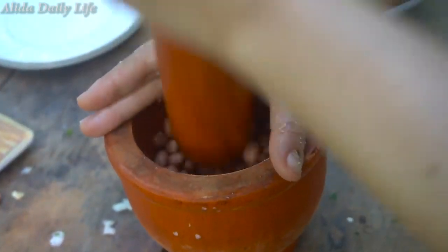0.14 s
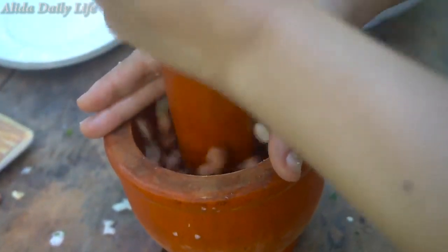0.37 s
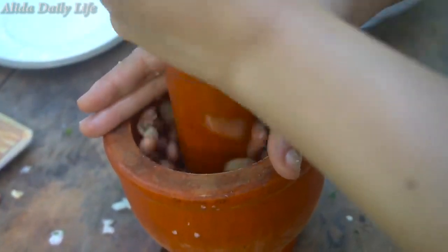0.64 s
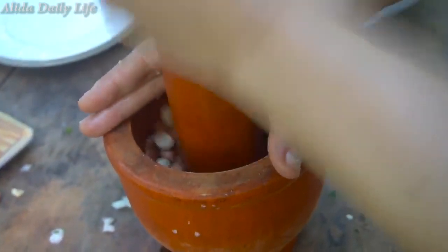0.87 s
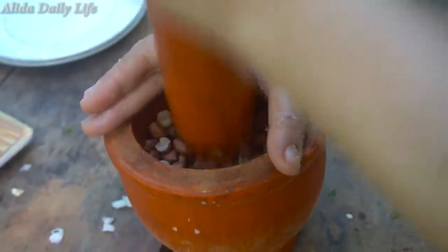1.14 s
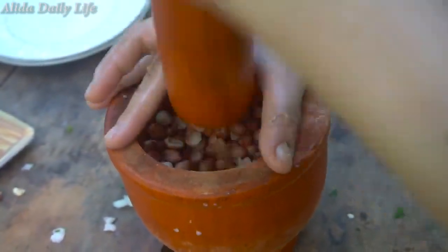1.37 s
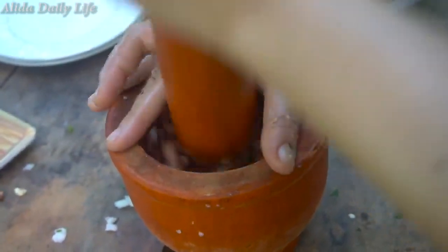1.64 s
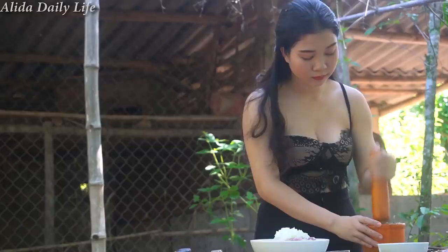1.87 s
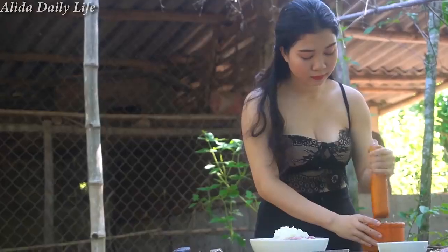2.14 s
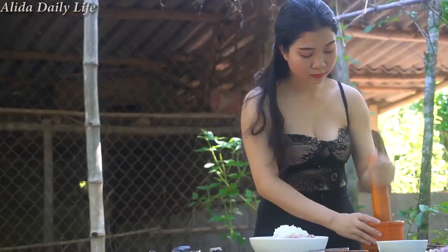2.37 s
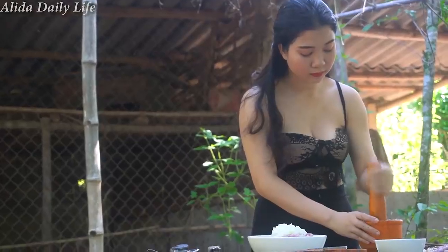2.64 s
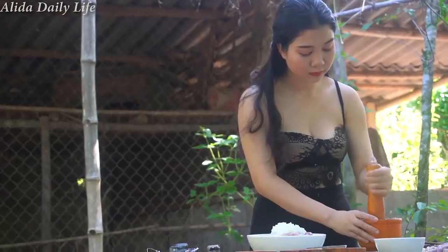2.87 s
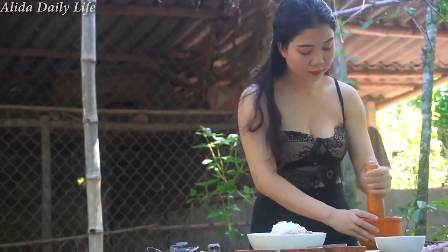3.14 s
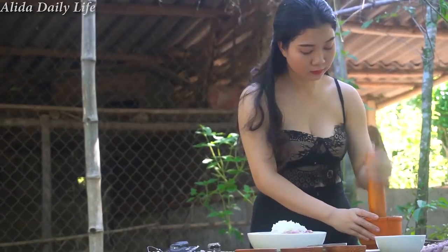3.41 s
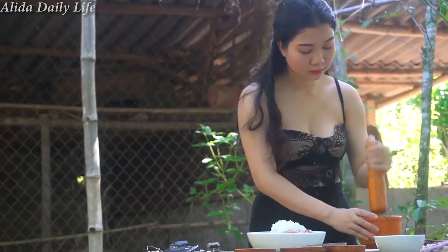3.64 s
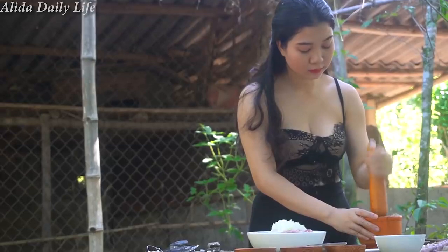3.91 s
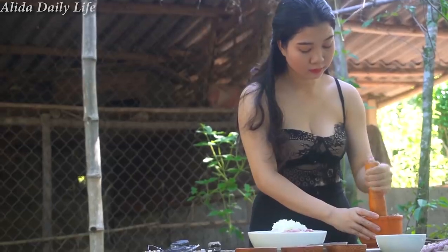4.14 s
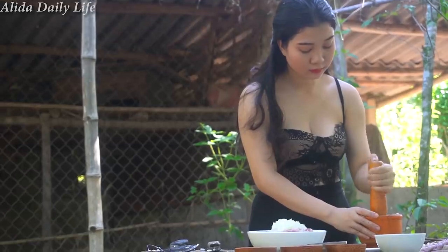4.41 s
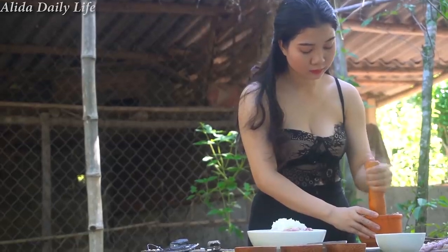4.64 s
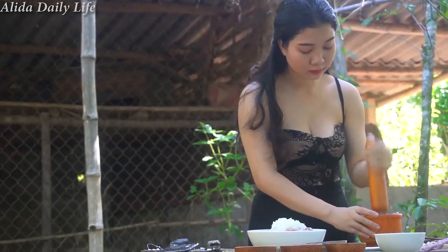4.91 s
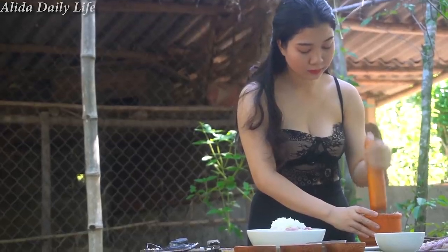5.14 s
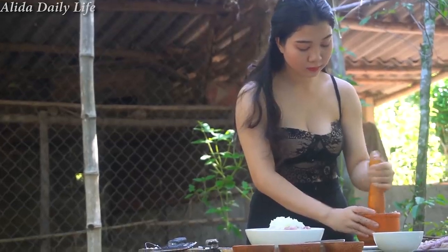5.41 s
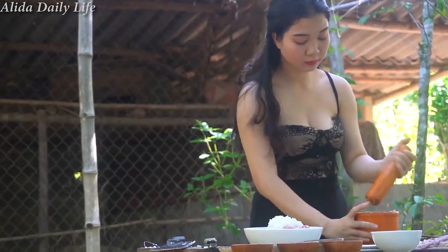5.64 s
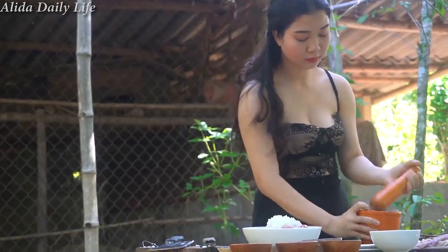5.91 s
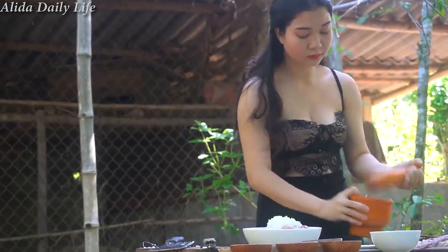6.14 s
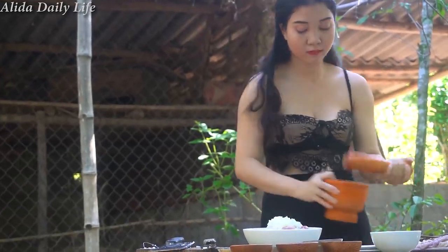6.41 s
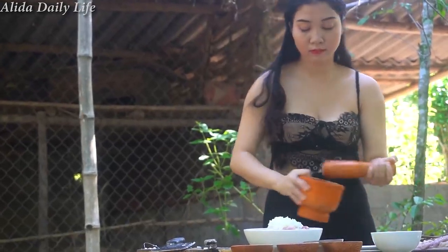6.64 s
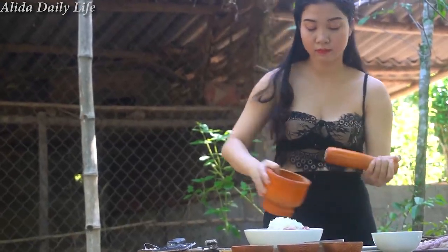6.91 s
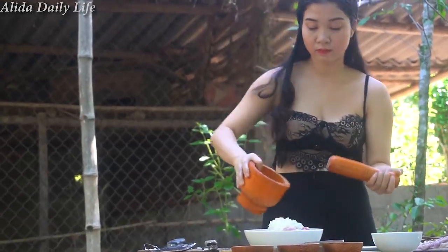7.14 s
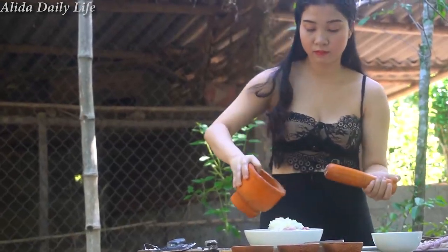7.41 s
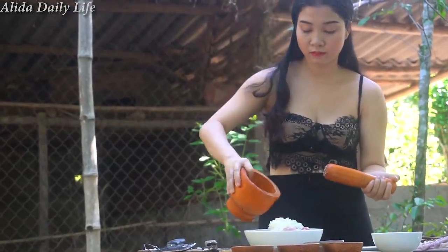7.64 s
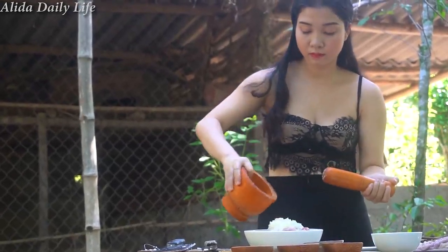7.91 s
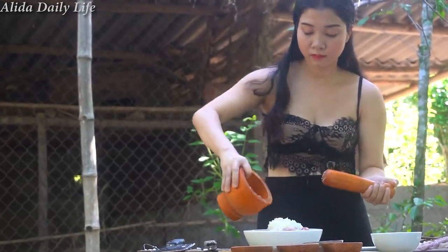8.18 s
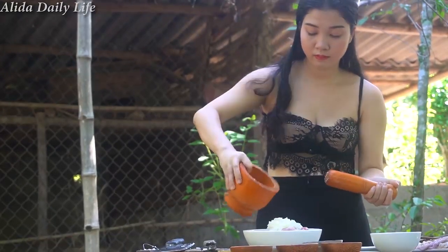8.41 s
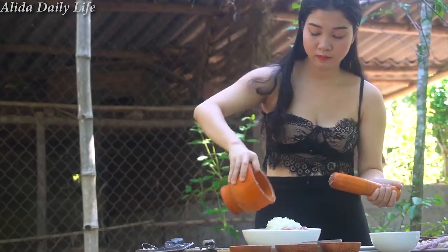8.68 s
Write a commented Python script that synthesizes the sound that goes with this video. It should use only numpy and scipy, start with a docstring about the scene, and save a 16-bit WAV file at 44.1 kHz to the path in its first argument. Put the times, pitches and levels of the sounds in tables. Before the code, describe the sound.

From 0 to 1.77 s the microphone is very close: six pestle blows, roughly 0.3 s apart, crunch peanuts with a gritty crack, a table thump and a quick rebound; dishes chatter and loose nuts rustle and tick. High cicadas buzz steadily over soft yard hiss. At 1.77 s the sound cuts to a farther place: cicadas drop somewhat, blows lose crack and bass, gain short roof echo, and bowls and a cup ring more clearly. The pounding keeps its pace with uneven strength, stronger near 3.26, 4.77 and 5.08 s, ending at 5.4 s. A faint low engine swells around 2.6 to 3.6 s and fades by 4.9 s. At 6.2, 6.44 and 6.67 s come three hollow, dry wooden taps on the rim, the last brightest. From 6.9 s tiny knocks cluster until 7.45 s, and a distant chick gives five faint, falling peeps until the end, under the cicadas.

```python
"""A wooden pestle pounds peanuts in a mortar on a light table under a tin roof, amid droning cicadas.
Close at first: each blow is a gritty force that crunches the nuts, thumps the table and makes it rebound,
so the crockery's modes chatter and ring, while loose nuts rustle. At 1.77 s the sound switches at once to
a place further off, and a far engine, a tone with its half order, swells and fades. After the last blow the
pestle taps the mortar's rim, a set of short modes; small knocks sound and a chick peeps in sliding whistles."""
import sys
import numpy as np
from scipy import signal
from scipy.fft import rfft, irfft, next_fast_len
from scipy.io import wavfile
from scipy.ndimage import uniform_filter1d, map_coordinates

SR = 44100
rng = np.random.default_rng(int(sys.argv[2]) if len(sys.argv) > 2 else 0)


def decibels_to_gain(level_db):
    """Convert a level in decibels to a linear amplitude gain (20 dB per decade)."""
    exponent = np.asarray(level_db, float) / 20
    return 10 ** exponent


def wav_out(sig):
    """Save sig, one row per channel (or a flat mono array), as 16-bit PCM at SR to the path in sys.argv[1]."""
    wavfile.write(sys.argv[1], SR, np.round(np.clip(np.atleast_2d(sig).T, -1, 1) * 32767).astype(np.int16))


N = 387638

# Cicadas' spectrum. Each row: frequency in Hz, relative density in dB.
CICADA_SPECTRUM = [(2350, -76), (4000, -43), (4990, -49), (5140, 0.5), (5620, 2), (6820, 1.5), (8270, -8),
                   (8760, -14), (9260, -14), (10500, -33), (22000, -120)]
# Spectrum of the yard's hiss. Each row: frequency in Hz, relative density in dB.
YARD_SPECTRUM = [(15, -59.5), (25, -11), (130, -20.5), (405, -11.5), (463, -18), (531, -9), (1400, -14.5),
                 (4140, -16.5), (5430, -7.5), (6560, -4.5), (9840, -20), (16000, -28.5)]
# Background heard from far. Each row: time in seconds, cicada level in dB, yard level in dB.
BACKGROUND_LEVELS = [(0, -49.5, -46.5), (4, -47, -51), (6, -47.5, -52), (8.79, -47, -53)]
# Likeness of the background at both ears. Each row: frequency in Hz, likeness from 0 to 1.
EAR_LIKENESS = [(60, .995), (180, 0.53), (550, 0.54), (1650, 0.14), (5000, 0.064)]
# Balance of the background. Each row: frequency in Hz, left minus right in dB.
EAR_BALANCE = [(240, 5), (950, -0.5), (6000, 1.5)]
# Far engine. Each row: time in seconds, firing rate in Hz, relative level in dB.
ENGINE_COURSE = [(0, 79.6, -78), (1.74, 76.2, -72), (1.76, 80, -70), (2.6, 80, -61), (3.6, 84, -59.5),
                 (4.5, 94.6, -70.5), (4.9, 94, -91), (8.79, 77, -87.5)]
# Steady faint tones. Each row: frequency in Hz, middle level in dB.
HUM_TONES = [(125, -78.5), (525, -76)]
# Chick. Each row: start in seconds, level in dB.
CHICK_PEEPS = [(6.945, -61), (7.44, -59), (7.85, -62), (8.27, -64), (8.70, -62)]
# Resonances of nuts rolling in the mortar. Each row: frequency in Hz, width in Hz, relative level in dB.
NUT_RESONANCES = [(1500, 5500, -2.5), (8750, 9000, 2.5)]
# Echo under the roof. Each row: frequency in Hz, t60 in seconds.
ROOF_DECAY = [(150, 0.21), (1000, 0.34), (4000, 0.35), (12000, 0.3)]
# Loose nuts and small knocks. Each row: start in seconds, relative level in dB, pitch in Hz, t60 in seconds.
KNOCKS = [(.162, -37, 1140, 0.044), (0.199, -13.5, 10450, 0.0065), (.53, -31.5, 1800, 0.11),
          (1.059, -18, 1280, 0.024), (1.067, -17.5, 1126, 0.054), (1.147, -37, 1500, 0.025),
          (1.622, -12.5, 1150, 0.043), (2.541, -21.5, 2510, 0.028), (3.827, -28.5, 1500, 0.013),
          (6.948, -46.5, 1300, 0.029), (7.165, -55, 2120, .6), (7.221, -44.5, 2100, 0.13),
          (7.224, -49, 620, 0.068), (7.267, -50.5, 1900, 0.11), (7.342, -48, 2350, 0.11),
          (7.342, -48.5, 655, 0.052), (7.425, -37.5, 350, 0.022), (7.424, -33, 1960, 0.017),
          (7.44, -44, 2080, 0.06)]
# Pestle on the rim. Each row: start in seconds, relative level in dB, brightness in dB.
RIM_TAPS = [(6.204, -7, -30.5), (6.438, -5.5, -28.5), (6.672, -4, -21.5)]
# Modes of the mortar's wall. Each row: frequency in Hz, relative level in dB, t60 in seconds.
RIM_MODES = [(708, -8.5, 0.023), (1100, -3, 0.013), (1363, 17, 0.0047), (1452, -17, 0.055),
             (1690, -11, 0.011), (2860, -9, 0.014), (4420, -3, 0.0056), (6710, -2.5, 0.0021)]
# Modes of both bowls. Each row: frequency in Hz, relative level in dB, t60 in seconds.
BOWL_MODES = [(1605, -6, .5), (2342, -6, .24), (3128, -2, .09), (3542, -3, .2), (3676, -3, .14)]
# Mode of the cup. Each row: frequency in Hz, relative level in dB, t60 in seconds.
CUP_MODES = [(3957, 0, .46)]
# Modes of the dishes. Each row: frequency in Hz, relative level in dB from far, relative level in dB
# from close, t60 in seconds.
DISH_MODES = [(3260, -20, -1, .03), (4964, -1, -3, .016), (5195, 1, 3, .024), (6321, -8, -8, .03),
              (6835, -3, -12, .03), (7125, 3, -7, .02), (7660, -1, -5, .02), (9120, -16, -6, .045),
              (10750, -11, -12, .018), (12600, -9, -14, .005)]
# Resonances of the table. Each row: frequency in Hz, width in Hz, relative level in dB.
TABLE_RESONANCES = [(163, 150, -8), (272.3, 49, 1), (404, 57, 0.5), (587, 74, 0.5), (696, 55, 1)]
# Resonances of the mortar at rest. Each row: frequency in Hz, width in Hz, relative level in dB.
MORTAR_RESONANCES = [(805, 210, 2), (1186, 277, 2), (1800, 144, 4), (2345, 420, -2.5), (3234, 440, -2.5),
                     (5240, 23000, -40)]
# Resonances of splitting shells. Each row: frequency in Hz, width in Hz, relative level in dB.
SHELL_RESONANCES = [(4130, 4400, 22), (10000, 6000, -13.5)]
# Pestle blows. Each row: time in seconds, force in dB, then relative levels in dB of the dish chatter,
# small bowl ring, big bowl ring and cup ring.
PESTLE_BLOWS = [(0.08, -12.5, 4, -10, -17, -20), (0.379, -16.5, 1, -15.5, -10, -16),
                (0.675, -12.5, -5, -15.5, -15, -26), (0.975, -13.5, -4, -15.5, -19, -15),
                (1.277, -13, -4, -7, -7.5, -13), (1.576, -10, -20.5, -13.5, -16.5, -22),
                (1.779, -10, 5.5, -2, -2.5, -6), (2.053, -14, -1, -4, -2, -1.5),
                (2.345, -10.5, 3.5, -5, -23, -13.5), (2.652, -13.5, -3.5, -7, -3.5, -1.5),
                (2.953, -26, -9.5, -9, -19, -2), (3.257, -6.5, 2, -6.5, -7.5, -10.5),
                (3.554, -16.5, -3.5, -5.5, -5.5, -12.5), (3.854, -11, 1.5, -4.5, -27, -12),
                (4.153, -22.5, -3.5, -5.5, -4, -8), (4.466, -19, -1.5, -8, -3, -2.5),
                (4.767, -8.5, 4, -3, 1, -14), (5.079, -8, 2, -3.5, -5.5, -27),
                (5.391, -21, -1.5, -6.5, -13, -8.5)]
# The table springs back after a blow. Each row: time in seconds, force in dB.
TABLE_REBOUNDS = [(.094, -11), (0.119, -13), (0.397, -14.5), (.42, -16.5), (0.701, -4), (.989, -9),
                  (1.014, -9), (1.292, -0.5), (1.603, -7.5), (2.081, -19), (2.375, -12.5), (2.685, -16),
                  (2.989, -20.5), (3.281, -16.5), (3.585, -19.5), (3.882, -13), (4.191, -23.5), (4.26, -31),
                  (4.497, -21), (4.791, -16.5), (5.108, -11), (5.415, -20.5)]
# How a jolt sounds from each place. Each pair holds blow, rebound: rise_s and t60_s of a usual jolt's
# force in seconds; crack_db, thump_db, chatter_db and ring_db, relative levels in dB. Single values:
# split_s, t60 of the extra decay of shell splitting in seconds; wet_db, echo in dB; left_db, gain in dB
# on the left and its opposite on the right; bass_hz, bass corner in Hz.
CLOSE_PLACE = dict(rise_s=[.003, .0045], t60_s=[0.091, 0.086], crack_db=[7.5, -32], thump_db=[-4.5, -20],
               chatter_db=[2, -4], ring_db=[-8.5, 11], split_s=0.064, wet_db=-7, left_db=0.63, bass_hz=40.7)
FAR_PLACE = dict(rise_s=[.006, .0055], t60_s=[0.12, .13], crack_db=[-14, -3.5], thump_db=[-15, -20.5],
             chatter_db=[-0.5, 1.5], ring_db=[-0.1, 2.3],
             split_s=0.11, wet_db=-3.5, left_db=-0.36, bass_hz=147)

SWITCH_S = 1.772  # the sound switches at once from the close place to the far one
CLOSE_CICADA_DB, CLOSE_YARD_DB = 8, -1  # change of each background level at the close place
LEAD_S = 0.000284  # the background reaches the left ear first
RIM_SCATTER_DB = 1.2
BIG_BOWL_HZ = 2000  # bowl modes below belong to the big bowl
USUAL_DB = -15  # a jolt of usual strength
LINGER = 0.29  # t60 grows this many dB for each dB under the usual: a soft jolt grinds on
SQUEEZE_S, SQUEEZE_DB = .014, -26  # the nuts give way just before the pestle lands
SHIFT, SHIFT_DB = .04, 2  # spread of the mortar's relative pitch and of its levels from jolt to jolt
CLUMP_DB = 3  # nuts break in clumps a few ms apart, so the force stutters
PAIR_HZ, BASS_HZ, TOP_HZ = 150, 70, 16100  # below PAIR_HZ the two sides grow alike


def unit(x):
    """Normalization: equal mean power, rms 1."""
    return x / np.sqrt(np.mean(x ** 2) + 1e-20)


def along(points, hz):
    """Interpolation of (Hz, value) points on a logarithmic frequency axis."""
    f, v = np.transpose(points)
    return np.interp(np.log(hz + 1), np.log(f + 1), v)


def curves(rows):
    """Linear interpolation in time: one value per sample for each column after the time."""
    s, *cols = np.transpose(rows)
    return [np.interp(np.arange(N) / SR, s, c) for c in cols]


def wobble(rate):
    """Slow random modulation: a smooth curve through rate random knots a second."""
    knots = rng.standard_normal(int(N * rate / SR) + 4)
    return map_coordinates(knots, [np.arange(N) * rate / SR])


def filtered(x, response):
    """Linear filtering: the spectrum times a complex response of frequency."""
    m = next_fast_len(x.shape[-1] + 8192)
    return irfft(rfft(x, m) * response(np.fft.rfftfreq(m, 1 / SR)), m)[..., :x.shape[-1]]


def bass_cut(x, corner_hz):
    """Second-order high-pass: two equal first-order sections."""
    return filtered(x, lambda hz: (1j * hz / (1j * hz + corner_hz)) ** 2)


def body(peaks):
    """Resonance: impulse response of damped resonators in alternating phase, energy 1."""
    def response(f):
        total = 0
        for k, (centre, width, db) in enumerate(peaks):
            resonator = 1j * f * width / (centre * centre - f * f + 1j * f * width)
            total = total + (-1) ** k * decibels_to_gain(db) * resonator
        return total
    answer = filtered(np.eye(1, 4096)[0], response)
    return answer / np.linalg.norm(answer)


def ring(modes, scatter_db, length, beat=0):
    """Modal decay: each strike excites the modes anew; an unround bowl splits its modes, so they beat."""
    t = np.arange(round(length * SR)) / SR
    hz, db, t60 = np.transpose(modes)[:, :, None]
    swell = np.cos(np.pi * beat * t * rng.uniform(.75, 1.3, hz.shape))
    level = decibels_to_gain(db + scatter_db * rng.standard_normal(hz.shape) - 60 * t / t60)
    return np.sum(level * swell * np.sin(2 * np.pi * hz * t), axis=0)


def grit(count, spiky_db):
    """Granular fracture: noise whose size jumps from grain to grain, rms 1."""
    sizes = np.minimum(rng.exponential(size=count // 40 + 1), 3.5)
    sizes = np.repeat(sizes, 40)[:count]
    return unit(rng.standard_normal(count) * decibels_to_gain(spiky_db * sizes))


def driven(force, spiky_db, answer):
    """Forced vibration: grit under a force curve shakes a body; the energy follows the force."""
    part = signal.fftconvolve(force * grit(len(force), spiky_db), answer)
    return np.pad(part, (0, SR - len(part))) * np.linalg.norm(force) / np.linalg.norm(part)


def roofed(x, wet_db):
    """Reverberation: direct sound plus a fresh tail for each ear, each frequency with its own decay."""
    hz, t, z = signal.stft(rng.standard_normal((2, SR // 2)), SR, nperseg=256)
    decay = decibels_to_gain(-60 * t / along(ROOF_DECAY, hz)[:, None])
    tail = signal.istft(z * decay, SR, nperseg=256)[1]
    likeness = [(300, .999), (700, 0.95), (1500, 0.68), (5000, 0.1)]  # low notes reach both ears alike
    shared = np.clip(along(likeness, np.fft.rfftfreq(tail.shape[1], 1 / SR)), 0, 1)
    left, right = rfft(tail)
    tail[1] = irfft(shared * left + np.sqrt(1 - shared ** 2) * right, tail.shape[1])
    delayed = np.pad(x, (130, 0))[None]
    wet = signal.fftconvolve(delayed, tail / np.linalg.norm(tail[0]), axes=1)
    return decibels_to_gain(wet_db) * wet + np.pad(x, (0, wet.shape[1] - len(x)))


def add(out, s, x):
    """Superposition: mixes x into out from second s."""
    part = out[:, round(s * SR):][:, :x.shape[1]]
    part += x[:, :part.shape[1]]


def rush(spectrum, patchy_db):
    """Diffuse field: partly alike stereo noise of rms 1 with patches of random gain."""
    z = signal.stft(rng.standard_normal((2, N)), nperseg=512)[2]
    field = rng.standard_normal(z.shape[1:])
    field = uniform_filter1d(uniform_filter1d(field, 6, 0), 10, 1)
    pair = signal.istft(z * decibels_to_gain(patchy_db * unit(field)), nperseg=512)[1][:, :N]

    def spread(hz):
        angle = np.arccos(np.clip(along(EAR_LIKENESS, hz), -1, 1)) / 2
        return decibels_to_gain(along(spectrum, hz)) * [np.cos(angle), np.sin(angle)]

    def direction(hz):
        balance = decibels_to_gain(np.outer([.5, -.5], along(EAR_BALANCE, hz)))
        return balance * np.exp(np.outer([1j, -1j], hz * np.pi * LEAD_S))

    mid, side = filtered(pair, spread)
    return unit(filtered(np.array([mid + side, mid - side]), direction))


def yard():
    """Broadband ambience: the yard's distant hiss is shaped noise of slowly varying level."""
    level_db = curves(BACKGROUND_LEVELS)[1]
    close = np.arange(N) < SWITCH_S * SR
    level_db = level_db + CLOSE_YARD_DB * close + .7 * wobble(6.9)
    return decibels_to_gain(level_db) * rush(YARD_SPECTRUM, patchy_db=1.8)


def cicadas():
    """Incoherent chorus: band-shaped noise that flutters slowly and quickly."""
    level_db = curves(BACKGROUND_LEVELS)[0]
    close = np.arange(N) < SWITCH_S * SR
    level_db = level_db + CLOSE_CICADA_DB * close + 0.84 * wobble(1.7) + 0.77 * wobble(120)
    return decibels_to_gain(level_db) * rush(CICADA_SPECTRUM, patchy_db=1.0)


def hums():
    """Steady tones: faint sinusoids wavering in level and phase."""
    t, out = np.arange(N) / SR, np.zeros(N)
    for hz, db in HUM_TONES:
        level = decibels_to_gain(db + 3.5 * wobble(0.94))
        out += level * np.sin(2 * np.pi * hz * t + 1.5 * wobble(3.0))
    return out


def engine():
    """Periodic firing: a far engine sounds its firing rate and the half order below."""
    hz, db = curves(ENGINE_COURSE)
    phase = 2 * np.pi * np.cumsum(hz) / SR
    level = decibels_to_gain(db + 5.0 + .8 * wobble(5.5))
    return level * (np.sin(phase) + decibels_to_gain(-7) * np.sin(phase / 2))


def chick():
    """Frequency modulation: short whistles slide down in pitch."""
    out, t = np.zeros((2, N)), np.arange(round(.055 * SR)) / SR
    pitch_hz = 2750 + 850 * np.exp(-t / 0.018)
    peep = np.sin(2 * np.pi * np.cumsum(pitch_hz) / SR) * np.sin(np.pi * t / t[-1])
    for s, db in CHICK_PEEPS:
        add(out, s, roofed(decibels_to_gain(db) * peep, wet_db=-10))
    return out


def nuts():
    """Granular friction: up close, loose nuts keep rustling, grit coloured by broad resonances."""
    count = round(SWITCH_S * SR)
    rustle = np.array([grit(count, 2.9), grit(count, 1.9)])
    rustle = rustle + 0.22 * rustle[::-1]  # each side leaks into the other
    rustle = signal.fftconvolve(rustle, body(NUT_RESONANCES)[None], axes=1)[:, :count]
    level = decibels_to_gain(-48.5 + 2.5 * wobble(60)[:count])
    return np.pad(level * rustle, ((0, 0), (0, N - count)))


def knocks():
    """Impulsive excitation: each loose nut or small knock is a gritty puff around one pitch."""
    out, t = np.zeros((2, N)), np.arange(SR // 4) / SR
    for s, db, hz, t60 in KNOCKS:
        burst = decibels_to_gain(db - 60 * t / t60) * (1 - np.exp(-t / (.025 * t60))) * grit(len(t), 3)
        colour = body([(hz, 0.77 * hz, 0)])
        steep = signal.fftconvolve(colour, colour)  # twice through for steeper skirts
        puff = signal.fftconvolve(burst, steep / np.linalg.norm(steep))
        add(out, s, roofed(puff, wet_db=-12.5))
    return out


def rim_taps():
    """Modal excitation: each tap rings the mortar's wall over a short crack and a juddering clatter."""
    out, t = np.zeros((2, N)), np.arange(SR // 4) / SR
    snap = body([(3700, 3650, 0)])
    snap = np.convolve(snap, snap)
    snap = snap / np.linalg.norm(snap)
    for s, db, bright_db in RIM_TAPS:
        modes = [(hz, level + (bright_db + 29.0) * (hz > 2300), t60) for hz, level, t60 in RIM_MODES]
        crack = decibels_to_gain(bright_db - 1 - 60 * t / 0.065) * rng.standard_normal(len(t))
        crack = np.convolve(crack, snap)[:len(t)]
        # the wood judders after the tap
        judder = driven(decibels_to_gain(-60 * t / 0.013), 1.1, ring(modes, RIM_SCATTER_DB, .25))
        clatter = decibels_to_gain(-7.5) * judder[:len(t)]
        onset = decibels_to_gain(db + 1.0) * (1 - np.exp(-t / 0.0028))
        tap = onset * (ring(modes, RIM_SCATTER_DB, .25) + crack + clatter)
        add(out, s, roofed(bass_cut(tap, 450), wet_db=-7.5))  # a small mortar radiates no bass
    return out


def retuned_mortar():
    """Resonance shift: the heap of nuts lies differently at each jolt and retunes the mortar."""
    peaks = []
    for hz, width, level in MORTAR_RESONANCES:
        a, b = rng.standard_normal(2)
        peaks.append((hz * (1 + SHIFT * a), width, level + SHIFT_DB * b))
    return body(peaks)


def jolt_force(t, since, db, rise, t60):
    """Impact force: a soft squeeze, then a rise and exponential decay that stutter as clumps break."""
    squeeze = decibels_to_gain(SQUEEZE_DB) * np.minimum(t / SQUEEZE_S, 1) ** 2
    force = np.maximum((1 - np.exp(-since / rise)) ** 2, squeeze) * decibels_to_gain(db - 60 * since / t60)
    clumps = np.interp(t, np.arange(50) / 250, rng.standard_normal(50))
    return force * decibels_to_gain(CLUMP_DB * clumps)


def pounding():
    """Coupled vibration: every blow and rebound drives mortar, table and crockery with a gritty force."""
    out, t = np.zeros((2, N)), np.arange(SR // 5) / SR
    since = np.maximum(t - SQUEEZE_S, 0)
    table, shell = body(TABLE_RESONANCES), body(SHELL_RESONANCES)
    big = [m for m in BOWL_MODES if m[0] < BIG_BOWL_HZ]
    small = [m for m in BOWL_MODES if m[0] > BIG_BOWL_HZ]
    starts = [row[0] for row in PESTLE_BLOWS]
    jolts = [(*row, 0) for row in PESTLE_BLOWS]  # kind 0 is a blow, 1 a rebound
    for s, db in TABLE_REBOUNDS:
        blow = PESTLE_BLOWS[np.searchsorted(starts, s) - 1]  # a rebound takes the crockery of its blow
        jolts.append((s, db, *blow[2:], 1))
    for s, db, chatter_db, small_db, big_db, cup_db, kind in jolts:
        is_close = s < SWITCH_S
        place = CLOSE_PLACE if is_close else FAR_PLACE
        rise = place["rise_s"][kind] * decibels_to_gain(.25 * max(USUAL_DB - db, 0))  # a soft jolt sets in gently
        t60 = place["t60_s"][kind] * decibels_to_gain(LINGER * (USUAL_DB - db))
        chatter_db = chatter_db + place["chatter_db"][kind]
        ring_db = place["ring_db"][kind] - 10.0
        mortar = retuned_mortar()
        dishes = [(hz, close_db if is_close else far_db, decay) for hz, far_db, close_db, decay in DISH_MODES]
        force = jolt_force(t, since, db, rise, t60)
        sharp = force * decibels_to_gain(-60 * since / place["split_s"])  # shells split early in the blow
        direct = decibels_to_gain(-5.0) * driven(force, 4.45, mortar)
        direct += decibels_to_gain(place["thump_db"][kind]) * driven(force, 1.0, table)
        direct += decibels_to_gain(place["crack_db"][kind]) * driven(sharp, 1.1, shell)
        direct += decibels_to_gain(chatter_db - 6.5) * driven(force, 5.7, ring(dishes, 3, .15))
        direct += decibels_to_gain(small_db + ring_db) * driven(force, 17, ring(small, 1.9, 0.38, beat=8.3))
        direct += decibels_to_gain(big_db + ring_db - 10.0) * driven(force, 7.5, ring(big, 1.5, .5, beat=1.33))
        direct += decibels_to_gain(cup_db + ring_db - 1.5) * driven(force, 9.7, ring(CUP_MODES, 0, .45, beat=4.7))
        direct = bass_cut(direct, place["bass_hz"])  # deep bass is trimmed from each jolt, higher up at the far place
        # dishes stand left and right; nuts crack on either side of the pestle
        sides = decibels_to_gain(chatter_db - 15.5) * driven(force, 3.2, ring(dishes, 2.8, .15))
        sides += decibels_to_gain(-18) * driven(force, 5, mortar)
        balance = decibels_to_gain([[place["left_db"]], [-place["left_db"]]])
        onset = s - rise - SQUEEZE_S
        add(out, onset, roofed(direct, wet_db=place["wet_db"]) * balance)
        add(out, onset, sides * [[1], [-1]])
    return out


def scene():
    """Superposition of all sources at the microphone pair."""
    background = yard() + cicadas() + hums() + engine() + chick()
    return background + nuts() + knocks() + rim_taps() + pounding()


def top_cut(x):
    """Nothing passes above the cut-off."""
    return signal.sosfilt(signal.butter(12, 16990, fs=SR, output="sos"), x)


def record(dry):
    """Close spacing: the pair hears bass alike on both sides and drops deepest bass and highest treble."""
    mid = (dry[0] + dry[1]) / 2
    side = bass_cut((dry[0] - dry[1]) / 2, PAIR_HZ)
    pair = bass_cut(np.array([mid + side, mid - side]), BASS_HZ)
    mix = filtered(pair, lambda hz: hz < TOP_HZ)
    return top_cut(mix)


dry = scene()
out = record(dry)
wav_out(out)
```